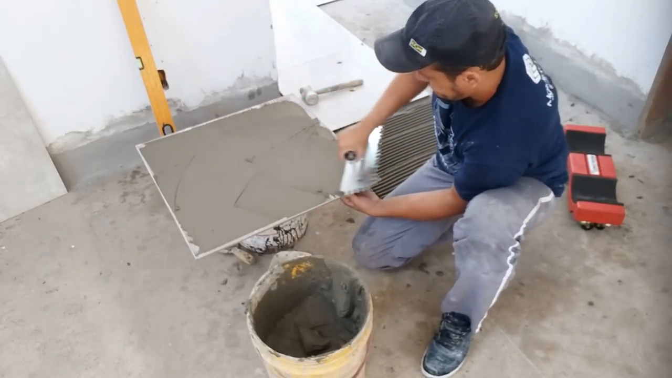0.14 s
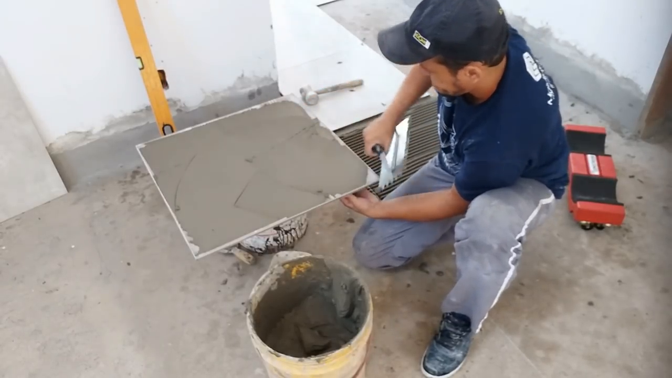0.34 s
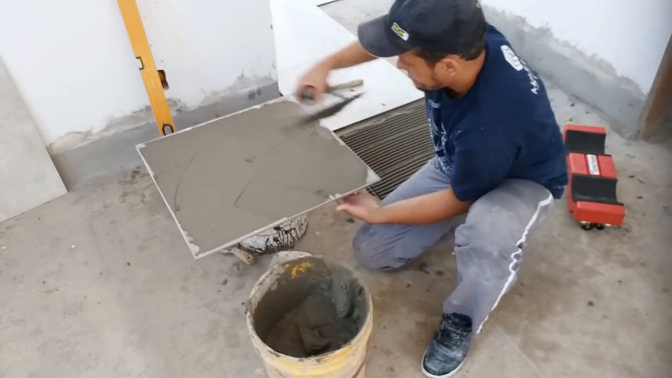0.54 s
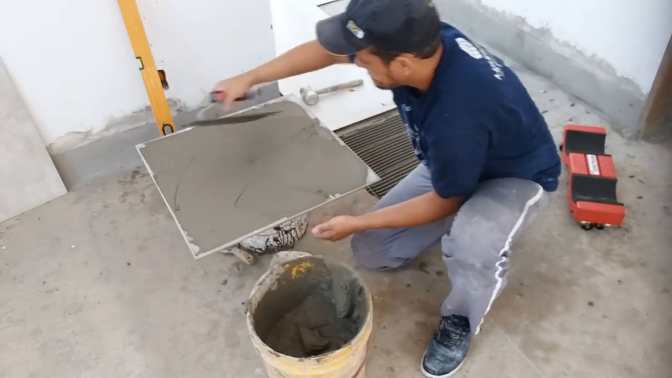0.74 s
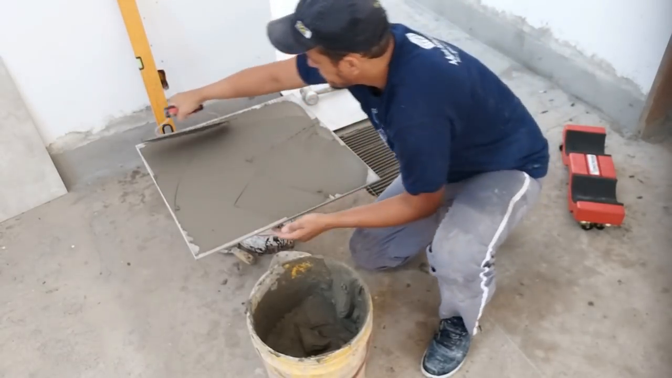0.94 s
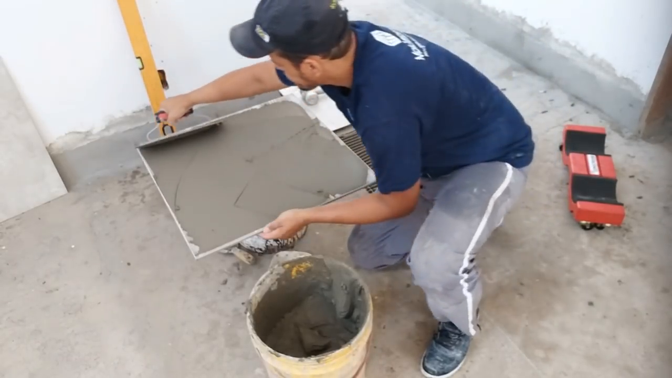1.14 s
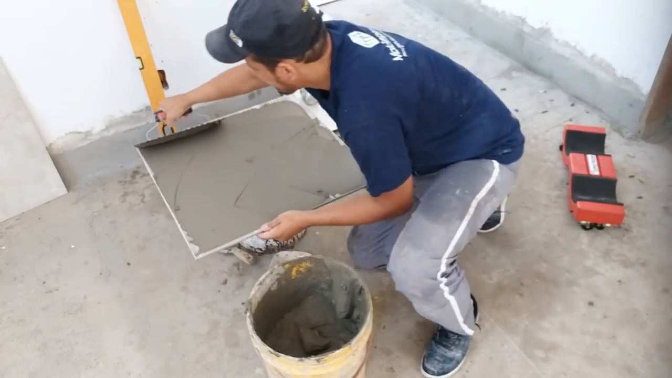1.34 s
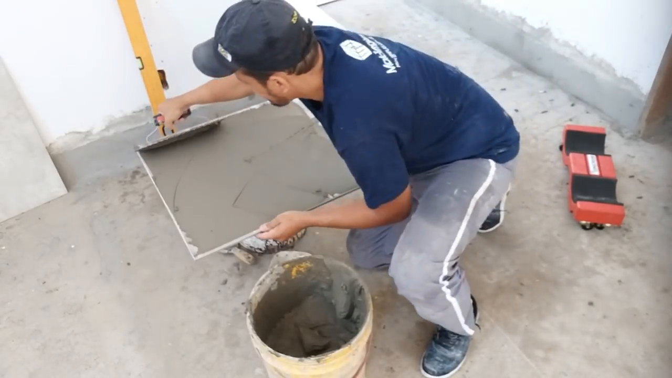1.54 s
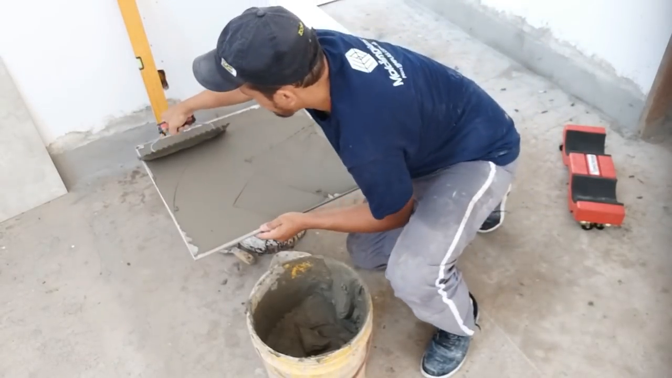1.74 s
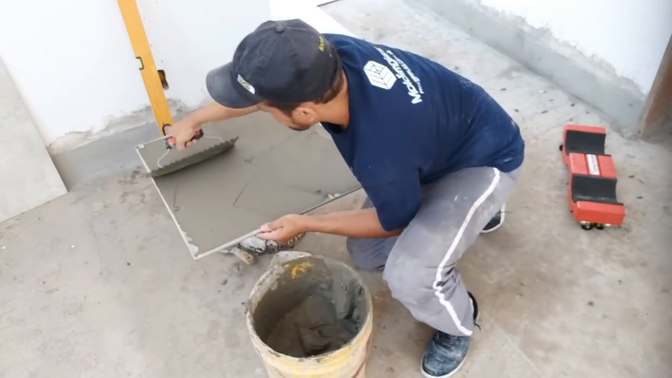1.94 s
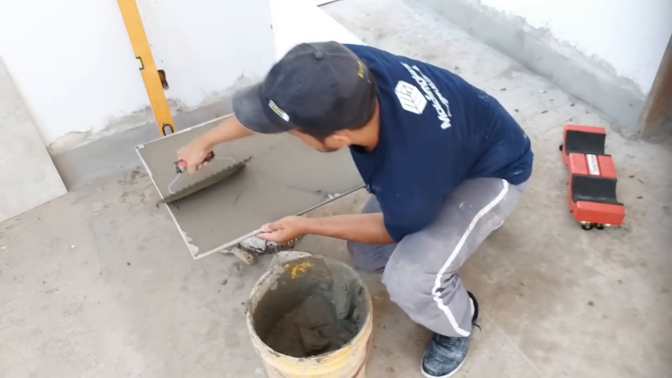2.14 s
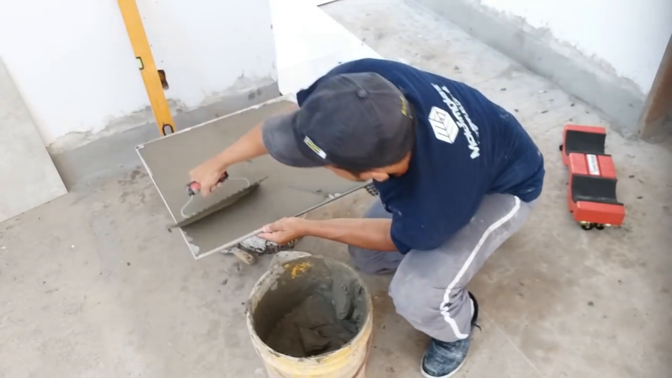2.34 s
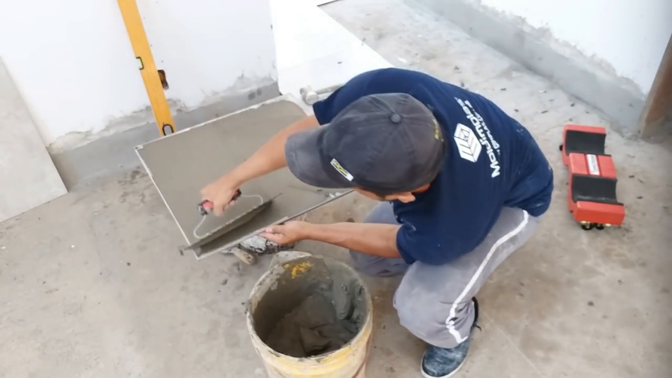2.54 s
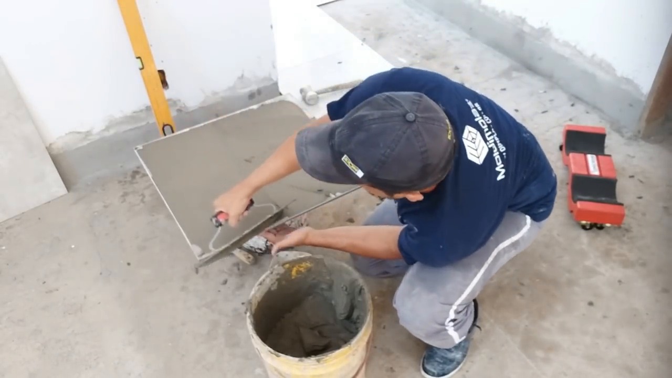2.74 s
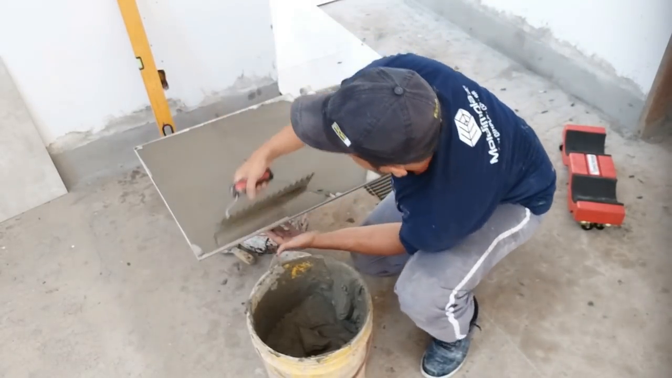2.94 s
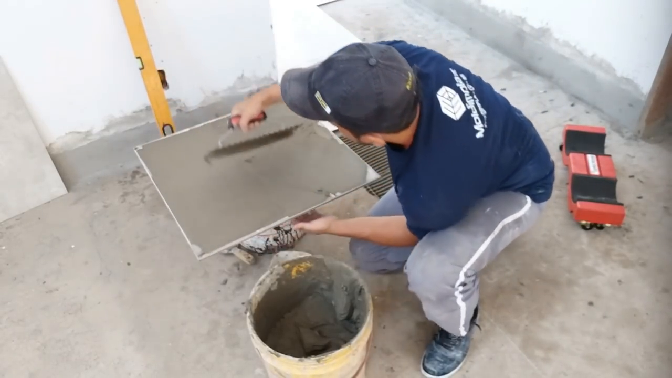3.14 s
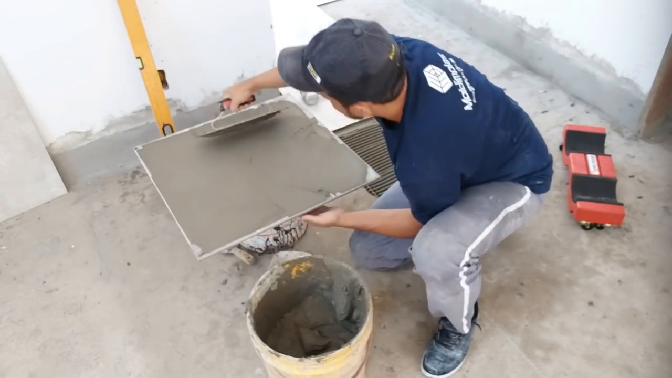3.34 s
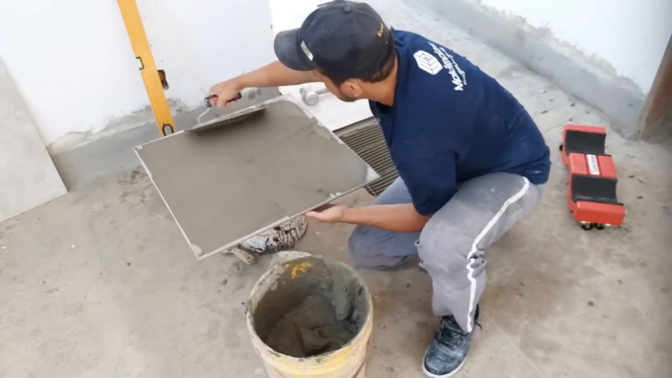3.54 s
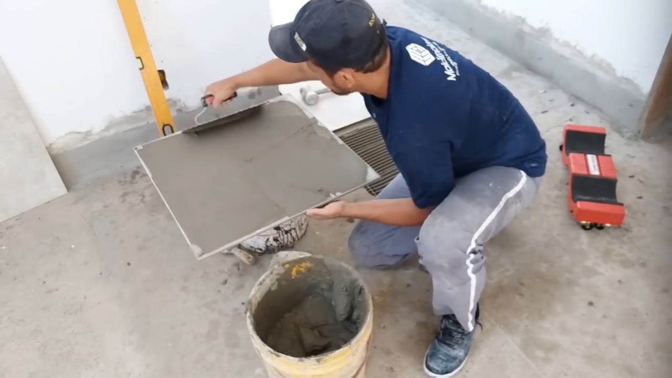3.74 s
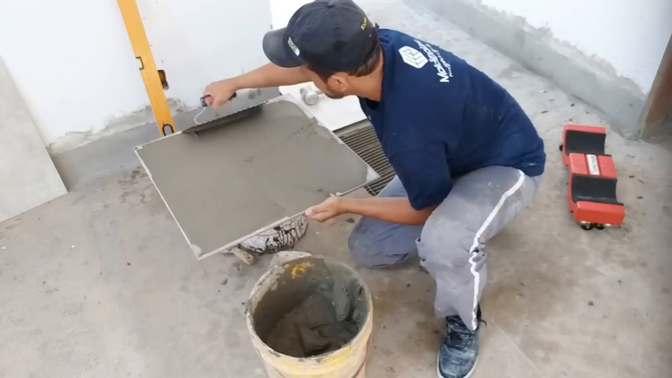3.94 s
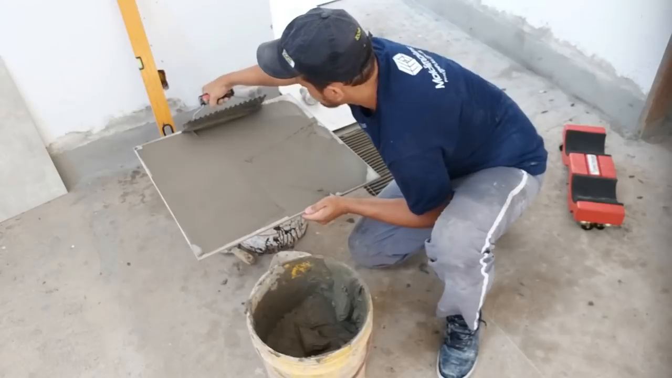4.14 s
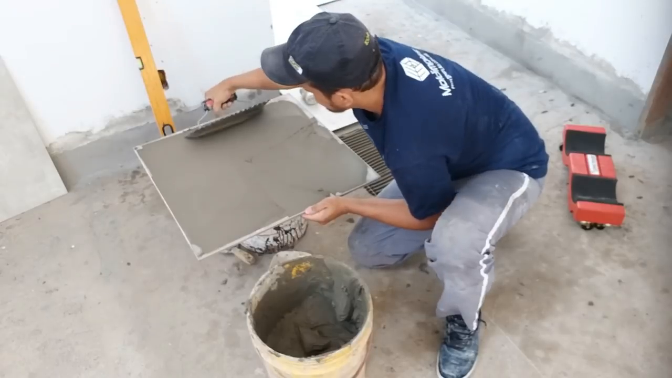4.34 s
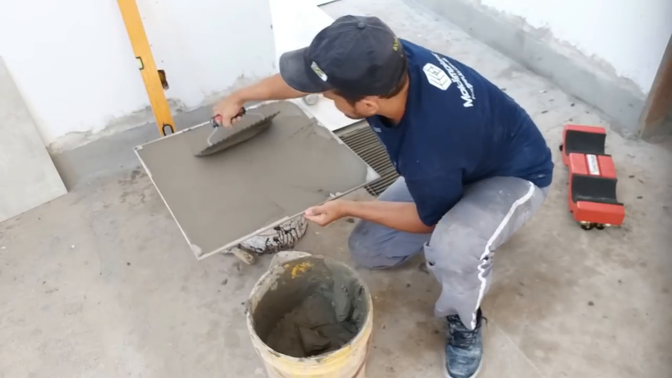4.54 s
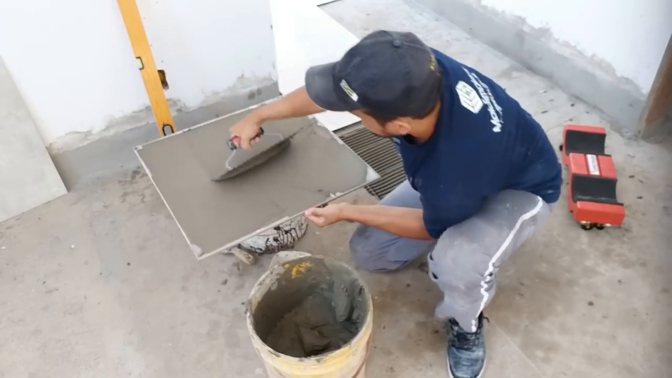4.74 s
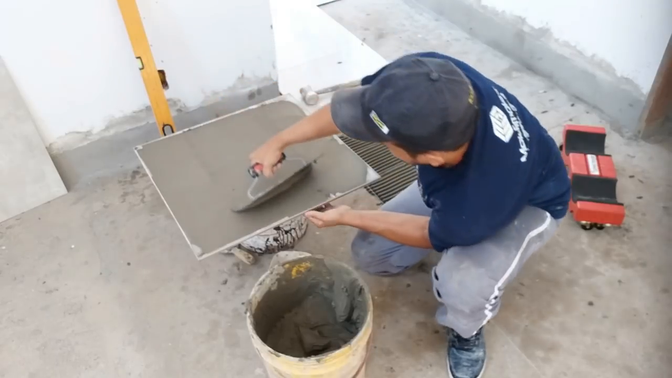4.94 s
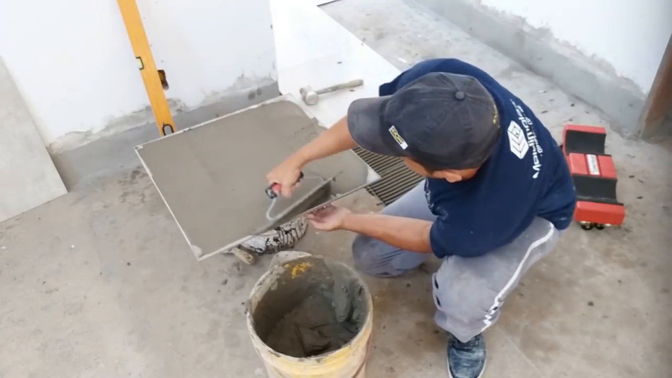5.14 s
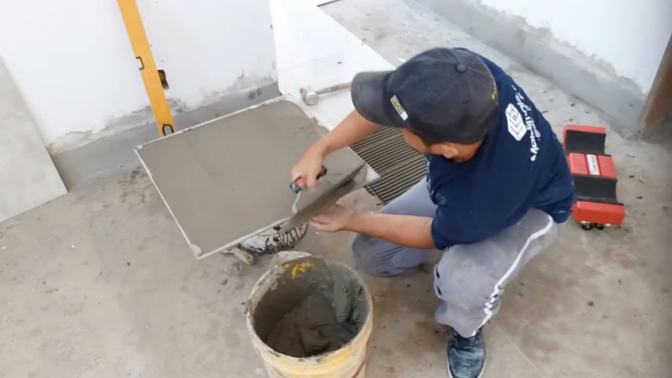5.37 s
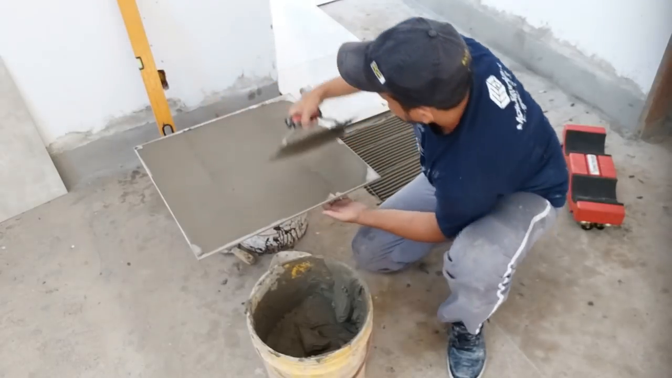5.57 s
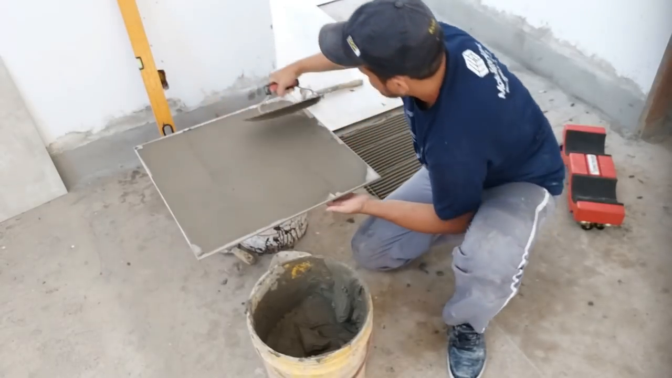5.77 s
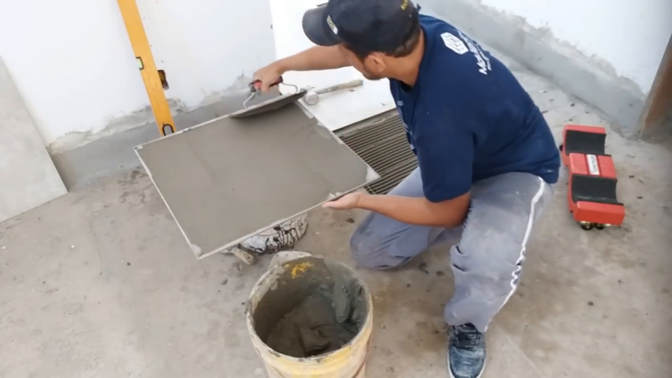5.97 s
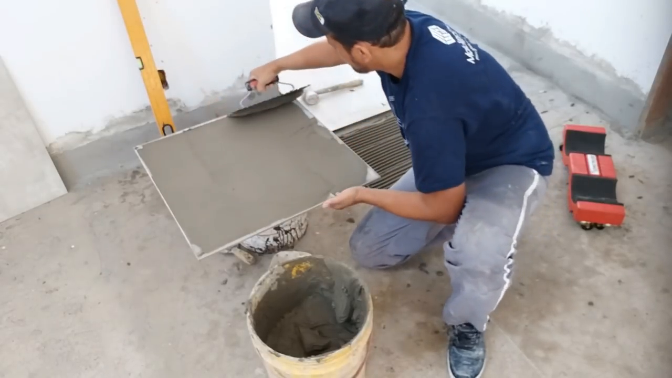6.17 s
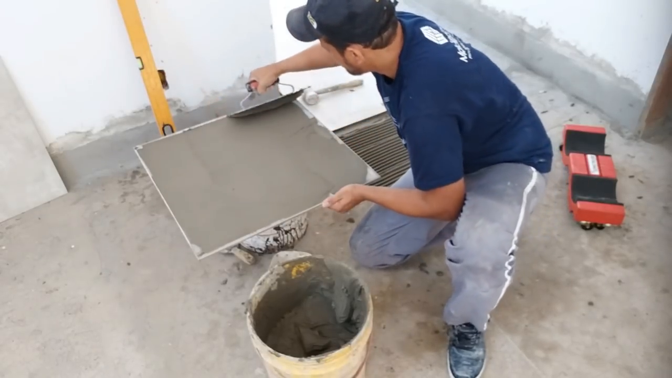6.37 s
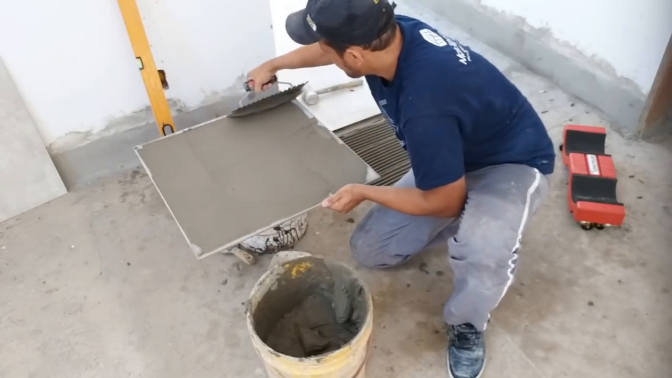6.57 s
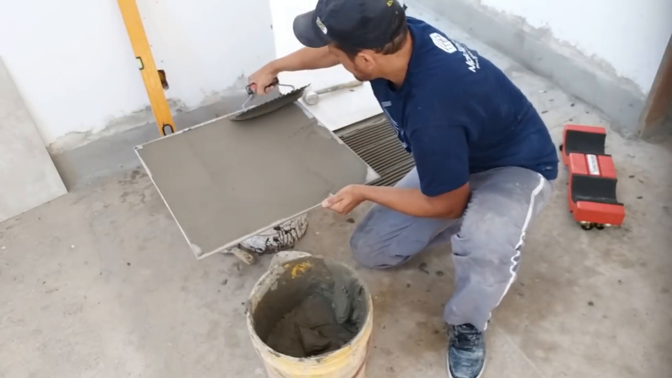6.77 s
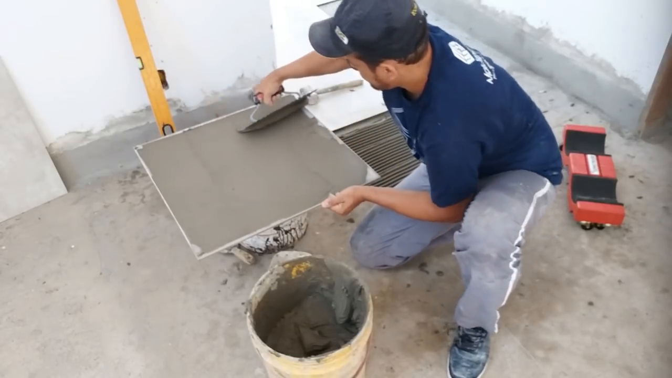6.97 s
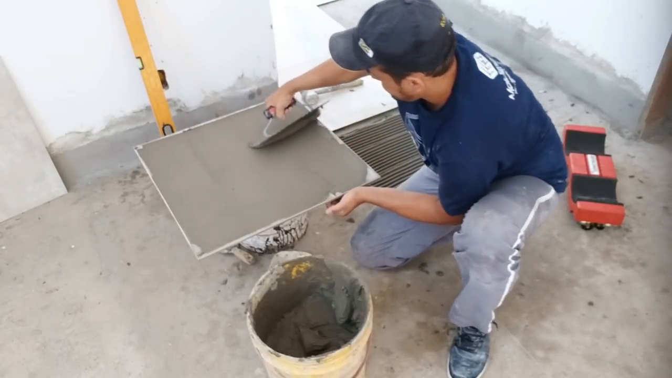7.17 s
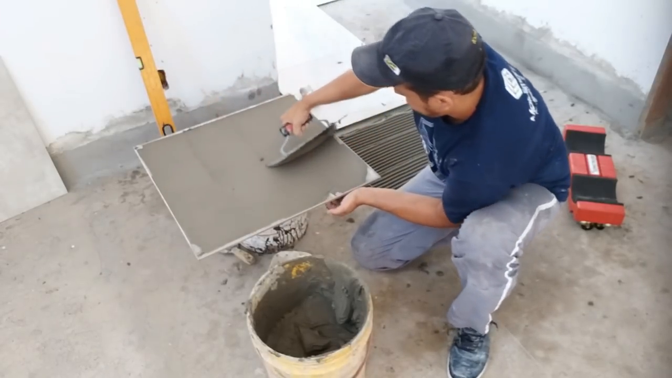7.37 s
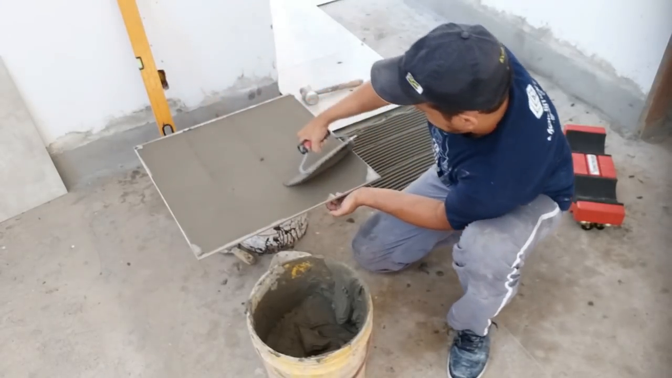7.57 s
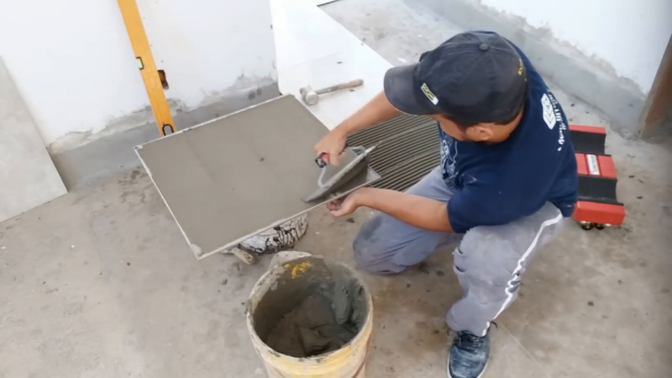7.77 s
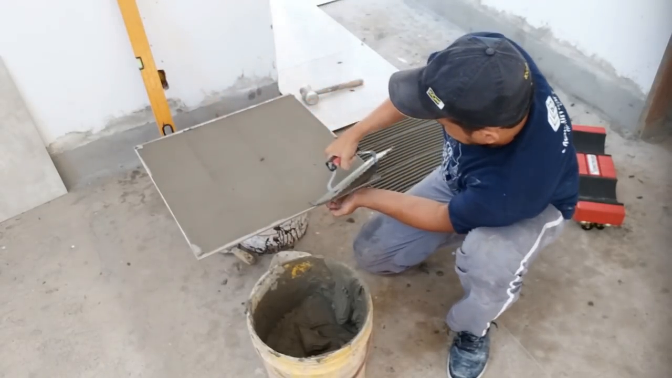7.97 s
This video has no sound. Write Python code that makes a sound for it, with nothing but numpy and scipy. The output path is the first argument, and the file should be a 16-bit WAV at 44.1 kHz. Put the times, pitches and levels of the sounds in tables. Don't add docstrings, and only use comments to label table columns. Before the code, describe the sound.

Sandy metallic scraping: a short rasp, then three long trowel drags across mortar, each preceded by light blade taps, with a reverberant tail.

```python
import sys
import numpy as np
from scipy import signal
from scipy.fft import rfft, irfft, next_fast_len
from scipy.io import wavfile
from scipy.ndimage import uniform_filter1d, map_coordinates

SR = 44100
rng = np.random.default_rng(int(sys.argv[2]) if len(sys.argv) > 2 else 0)


def master_out(mix):
    frames = np.transpose(np.atleast_2d(mix))
    ceiling = np.clip(frames, -1, 1)
    pcm = np.round(ceiling * 32767).astype(np.int16)
    wavfile.write(sys.argv[1], SR, pcm)


def invert_db(x):
    u = np.asarray(x, float) / 20
    return 10 ** u


N = 353241

# frequency in Hz, level in dB per Hz.
RUMBLE_COLOUR = [(12, -46.5), (25, -30.5), (60, -15.5), (150, -1.5), (230, -15.5), (400, -35.5),
                 (2000, -120)]
# frequency in Hz, level in dB per Hz.
WASH_COLOUR = [(150, -30), (280, -6), (550, -1), (1000, -7), (1700, -13), (2500, -23), (4500, -29),
               (7000, -35), (12000, -41), (15500, -46)]
# time in seconds, level in dB.
WASH_LEVEL = [(0, -75.5), (1.0, -88), (1.3, -72), (3.0, -60), (3.5, -58.5), (5.8, -60.5), (6.1, -58.5),
              (8.01, -56.5)]
# frequency in Hz, level in dB rms.
WHINES = [(11084, -86), (14982, -70)]
# frequency in Hz, T60 in seconds.
ROOM_T60 = [(150, 1.5), (400, 1.0), (1000, 0.87), (2800, 0.8), (7300, 0.64), (15000, 0.4)]
# time in
# seconds, gain in dB.
SCRAPE_GAIN = [(0.349, -1), (1.03, -4.5), (1.04, 0.5), (2.8, 0), (3.3, 1), (3.75, 7), (3.8, -.5), (5.5, -.5),
               (6.1, 1.5), (6.19, 1)]
# frequency in Hz, share of the sound added left and taken right.
PORT_SHADOW = [(1350, 0), (1550, .08), (1800, 0.22), (2300, .12), (2600, 0), (8900, 0), (9400, -.15),
               (10000, -.2), (10600, 0)]
# frequency in Hz, level in dB.
PORT_STRAY = [(1000, -70), (3800, -55), (4500, -34), (7000, -33), (15000, -32)]
# start in seconds, frequency in Hz, peak in dB, T60 in seconds.
THUDS = [
    (1.19, 75.9, -62.5, .3),
    (1.521, 221.5, -42.5, 0.26),
    (2.631, 150, -45, 0.25),
    (4.25, 263.5, -35.5, .2),
    (5.24, 144.2, -40.5, 0.51),
    (5.28, 204.6, -36, 0.29),
    (7.902, 205.8, -36, 0.32),
]
# start in seconds, frequency in Hz, peak in dB,
# T60 in seconds.
BLADE_RINGS = [(1.047, 720, -50, 0.25), (1.047, 1330, -45, 0.25), (1.12, 1000, -46.5, .15),
               (1.05, 3370, -58.5, .3), (1.06, 5440, -59.5, 0.36), (1.194, 2484, -39.5, 0.056),
               (1.36, 3300, -34, 0.04), (1.36, 2333, -34.5, .08), (3.906, 1442, -36, 0.23),
               (3.984, 3700, -41.5, .06), (4.116, 3356, -35, 0.18), (4.116, 4750, -35, 0.22),
               (4.2, 3360, -32, 0.15), (6.195, 1780, -51.5, 0.53), (6.26, 1280, -45.5, .7),
               (6.26, 1780, -59, 0.46), (6.424, 2366, -35, 0.06), (6.424, 1845, -39, 0.26),
               (6.458, 3084, -33.5, .08), (6.564, 1796, -38, .2)]
# time in seconds, level in dB.
LIFTS = [
    (.24, -35.5),
    (2.7, -46),
    (5.21, -40.5),
]
# frequency in Hz, level in dB, T60 in seconds.
FREE_BLADE = [(530, -4, .5), (715, -7, .55), (1255, -1, .8), (1480, -6, .6), (1790, 2.5, .78)]
# frequency in Hz, width in Hz, level in dB.
EDGE_MODES = [(2590, 18, 0), (2707, 30, -4), (3010, 21, -0.5), (3370, 120, 2.5), (3570, 40, -12.5),
              (3980, 36, 2), (4240, 260, -1), (4811, 14, -1)]
BLADE_MODES = [(793, 26, -2.5), (1034, 21, -7), (1173, 27, 0), (1292, 60, -5), (1467, 25, 0.5),
               (1780, 130, -4), (2038, 51, -5), (2135, 84, -7.5), (2360, 50, -3.5)]
TILE_MODES = [(227, 20, -5), (376, 14, 3), (530, 34, -21), (731, 8.6, 1.5)]
# frequency in Hz, level in dB per Hz.
GRIT_COLOUR = [(400, -120), (1500, -31), (2400, -3.5), (3200, -3), (4500, -3), (6000, -5), (7500, -13),
               (10000, -36), (16000, -77)]
RING_COLOUR = [(80, -120), (300, -35), (600, -9), (850, -4.5), (1300, -1.5), (1900, 0), (2600, -6.5),
               (5000, -22.5), (15000, -120)]
BODY_COLOUR = [(15, -50), (60, -35.5), (150, -19), (400, -5), (700, -1), (950, -4.5), (1500, -34.5),
               (5000, -120)]
FIZZ_COLOUR = [(1500, -120), (4500, -35), (6500, -4.5), (8000, 0.5), (11000, 0), (13500, -2.5), (15800, -7)]
# time in seconds, peak in dB, slide in dB re peak, flatness in dB,
# brightness in dB.
TOUCHES = [(1.047, -55.5, -9.5, 5, -16.5), (1.1219, -44, -10, 7.5, -8), (1.1939, -35.5, -13.5, 8, -11),
           (1.288, -37.5, -13.5, -7.5, -7.5), (1.3409, -43.5, -13.5, -5, -4.5),
           (1.3593, -36.5, -9, -0.5, -0.5), (1.3922, -31, -15, -12.5, -10.5),
           (1.4785, -24.5, -13.5, -9, -2), (3.808, -51, -2.5, -5, -12.5), (3.8474, -41, -8, 1, -11.5),
           (3.8812, -36.5, -9.5, 3, -7.5), (3.9053, -32.5, -14, 10.5, -10), (3.9833, -36, -9, 1.5, -5),
           (4.1162, -19.5, -15.5, -1, -7), (4.1261, -26.5, -10, -12, -11.5), (4.1995, -20.5, -9, -3, -8),
           (6.1936, -58, -3, 1, -7.5), (6.2552, -42, -18.5, -5, -13.5), (6.4233, -29, -14.5, 5, -10.5),
           (6.4573, -21.5, -19.5, 1, -8), (6.564, -33.5, -8, -15, 4), (6.6172, -32, -7.5, -8, -1.5)]
# time in seconds, pressure in dB, flatness of the blade in dB.
CREEPS = [
    [(1.03, -60, 6.5), (1.12, -56.5, 8), (1.2, -53, 7), (1.27, -58.5, 5), (1.35, -60.5, -4),
     (1.365, -41.5, 3), (1.47, -48, 1)],
    [(3.77, -73, 3.5), (3.852, -45, 0), (3.906, -46.5, 5), (4.096, -64.5, -0.5), (4.12, -39.5, 2.5),
     (4.19, -43.5, -2)],
    [(6.17, -79, 6), (6.266, -47.5, 2.5), (6.41, -67.5, 1), (6.426, -44.5, 3), (6.518, -50, -7.5),
     (6.6, -53.5, 0)],
]
# time in seconds, pressure in dB, flatness of the blade in dB.
DRAGS = [
    [(0, -16.5, -7.5), (.046, -24, -3), (.15, -43.5, -0.5)],
    [(.13, -44.5, 2), (.198, -30.5, 0), (.244, -22.5, -1.5), (.26, -26.5, 5), (.3, -28.5, -4)],
    [(1.47, -44, -5), (1.506, -25, -0.5), (1.754, -16.5, -1.5), (1.96, -18.5, -0.5), (2.026, -16.5, 0),
     (2.35, -27, 2), (2.578, -25, -2), (2.6, -28, 3.5), (2.72, -37, 6)],
    [(4.19, -33, -0.5), (4.344, -21, 0), (4.528, -16, -2), (4.756, -18, 1), (4.87, -16.5, -2),
     (4.946, -25.5, 0), (5.138, -27.5, -1.5), (5.206, -23, -1.5), (5.27, -45, 12)],
    [(6.6, -49, -4), (6.666, -31.5, -3), (6.892, -20, -3), (7.1, -20, -1.5), (7.414, -18.5, -4.5),
     (7.476, -24.5, -2.5), (7.666, -20.5, -3), (7.942, -33.5, -2.5), (8.01, -28.5, -4)],
]
# tile body in dB, fizz of the wet mortar in dB.
FEEL = [
    (-16.5, -1.5),
    (-5, -1.5),
    (-6, -4.5),
    (-13.5, -9),
    (-11.5, 2),
    (-9.5, 1),
    (-8.5, 0),
    (-9.5, -0.4),
]


def unit(x):
    return x / np.sqrt(np.mean(x ** 2) + 1e-20)


def along(points, hz):
    f, v = np.transpose(points)
    return np.interp(np.log(hz + 1), np.log(f + 1), v)


def filtered(x, response):
    m = next_fast_len(N + 8192)
    spectrum = rfft(x, m) * response(np.fft.rfftfreq(m, 1 / SR))
    return irfft(spectrum, m)[..., :N]


def wobble(rate_hz):
    knots = rng.standard_normal(int(N * rate_hz / SR) + 4)
    return map_coordinates(knots, [np.arange(N) * rate_hz / SR], order=1)


def patches(x, depth_db, tall_bins, wide_frames):
    z = signal.stft(x, nperseg=512)[2]
    field = uniform_filter1d(rng.standard_normal(z.shape), tall_bins, 0)
    field = uniform_filter1d(field, wide_frames, 1)
    return signal.istft(z * invert_db(depth_db * unit(field)), nperseg=512)[1][:N]


def tones(rows, attack_s, wander_rad):
    sound, age_s = np.zeros(N + SR), np.arange(SR) / SR
    for start_s, hz, db, t60_s in rows:
        drift = np.cumsum(rng.normal(0, wander_rad, SR))
        envelope = invert_db(db - 60 * age_s / t60_s) * (1 - np.exp(-age_s / attack_s))
        sound[round(start_s * SR):][:SR] += envelope * np.sin(2 * np.pi * hz * age_s + drift)
    return sound[:N]


def sand(spread_db, patchy_db):
    grains = rng.standard_normal(N) * invert_db(spread_db * wobble(900))
    return patches(grains, patchy_db, tall_bins=5, wide_frames=16)


def site():
    t = np.arange(N) / SR
    wash_db = np.interp(t, *np.transpose(WASH_LEVEL))
    rumble_db = -63.5 + 0.52 * (wash_db + 60.5)
    rumble = unit(filtered(rng.standard_normal(N), lambda f: invert_db(along(RUMBLE_COLOUR, f))))
    grain = sand(spread_db=-1.6, patchy_db=2)
    wash = unit(filtered(grain, lambda f: invert_db(along(WASH_COLOUR, f))))
    hiss = invert_db(-89) * np.sqrt(SR / 6000) * rng.standard_normal(N)
    whine = sum(invert_db(db) * np.sqrt(2) * np.sin(2 * np.pi * hz * t) for hz, db in WHINES)
    return invert_db(rumble_db) * rumble + invert_db(wash_db + 0.8 * wobble(3.3)) * wash + whine + hiss


def room(x, count):
    noise = rng.standard_normal((count, 5 * SR // 4))
    hz, t, z = signal.stft(noise, SR, nperseg=256)
    decay = invert_db(-60 * t / along(ROOM_T60, hz)[:, None])
    tails = signal.istft(z * decay, SR, nperseg=256)[1]
    step, answer = SR // 6, np.zeros(N + 3 * SR)
    fade = np.sin(np.pi * np.arange(2 * step) / (2 * step))
    padded = np.pad(x, (step, 2 * step))
    for k, start in enumerate(range(0, N + step, step)):
        part = signal.fftconvolve(fade * padded[start:start + 2 * step], tails[k % count])
        answer[start:start + len(part)] += part
    delay = 300
    return answer[step - delay:][:N] / np.linalg.norm(tails[0])


def thuds_and_rings():
    lifted = [(s, hz, db + level, t60) for s, db in LIFTS for hz, level, t60 in FREE_BLADE]
    free = tones(lifted, attack_s=0.012, wander_rad=0.016)
    thuds = tones(THUDS, attack_s=0.0069, wander_rad=0.063)
    rings = tones(BLADE_RINGS, attack_s=0.0015, wander_rad=0.051)
    return thuds + rings + free


def steel(colour, modes, between_db):
    def response(f):
        rings = sum(invert_db(db) * 1j * f * w / (c * c - f * f + 1j * f * w) for c, w, db in modes)
        return invert_db(along(colour, f)) * (invert_db(between_db) + rings)
    return response


def pressure():
    tile_per_flat, fizz_per_flat = 1.3, -0.1
    settle_s, tick_t60_s, slide_t60_s = 0.02, 0.0072, 0.11
    t, gains = np.arange(N) / SR, np.zeros((4, N))
    for rows, (tile_db, fizz_db) in zip(CREEPS + DRAGS, FEEL):
        s, grit_db, flat_db = np.transpose(rows)
        down = (t >= s[0]) & (t <= s[-1])
        already_moving = s[0] == 0
        landing = np.clip((t[down] - s[0]) / settle_s + already_moving, 0, 1)
        body_db = tile_db + tile_per_flat * flat_db
        wet_db = fizz_db + fizz_per_flat * flat_db
        for gain, rel_db in zip(gains, [0, flat_db, body_db, wet_db]):
            gain[down] += invert_db(np.interp(t[down], s, grit_db + rel_db)) * landing
    for start_s, db, slide_db, flat_db, bright_db in TOUCHES:
        start = round(start_s * SR)
        age_s = t[start:][:SR // 2] - start_s
        slide = invert_db(db + slide_db - 60 * age_s / slide_t60_s)
        tick = invert_db(db - 2 - 60 * age_s / tick_t60_s)
        balance = invert_db([[0], [flat_db], [flat_db - 15.5], [bright_db + 4]])
        gains[:, start:][:, :SR // 2] += (slide + tick) * balance
    return gains


def trowel():
    grit = steel(GRIT_COLOUR, EDGE_MODES, between_db=8)
    ring = steel(RING_COLOUR, BLADE_MODES, between_db=-3.5)
    body = steel(BODY_COLOUR, TILE_MODES, between_db=-5.0)
    fizz = steel(FIZZ_COLOUR, [], between_db=0)
    chatter = invert_db(1.0 * wobble(14) + 1.0 * wobble(60))
    sound = np.zeros(N)
    for gain, part in zip(pressure(), [grit, ring, body, fizz]):
        grains = unit(sand(spread_db=1, patchy_db=1.56))
        scale = np.sqrt(np.mean(np.abs(part(np.arange(0, SR / 2, 2))) ** 2))
        sound += filtered(gain * chatter * grains, part) / scale
    return sound


def scene():
    scrape = trowel() + thuds_and_rings()
    scrape_gain = invert_db(np.interp(np.arange(N) / SR, *np.transpose(SCRAPE_GAIN)))
    mid = scrape_gain * (invert_db(-2.5) * scrape + invert_db(-5.0) * room(scrape, count=6)) + site()
    late = np.pad(mid, (900, 0))
    scattered = patches(late, 10, tall_bins=30, wide_frames=4)
    stray = filtered(scattered, lambda f: invert_db(along(PORT_STRAY, f)))
    side = filtered(mid, lambda f: along(PORT_SHADOW, f)) + stray
    return np.array([mid + side, mid - side])


def band_limit(x):
    return signal.sosfilt(signal.butter(12, 16560, fs=SR, output="sos"), x)


def record(dry):
    top_hz, edge_hz = 15950, 250
    soft = dry / (1 + np.abs(dry) ** 6) ** (1 / 6)
    mix = filtered(soft, lambda hz: np.sin(np.pi / 2 * np.clip((top_hz - hz) / edge_hz, 0, 1)) ** 2)
    return band_limit(mix)


dry = scene()
out = record(dry)
master_out(out)
```